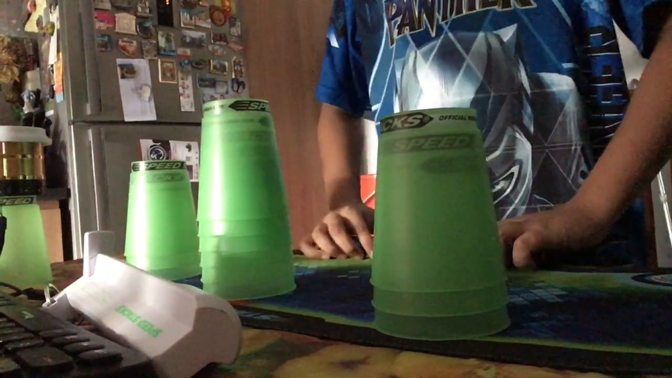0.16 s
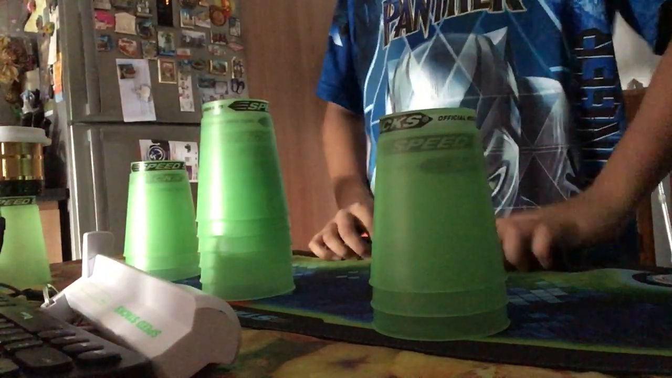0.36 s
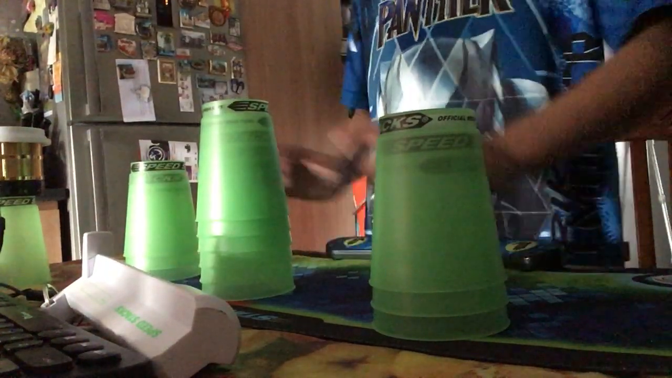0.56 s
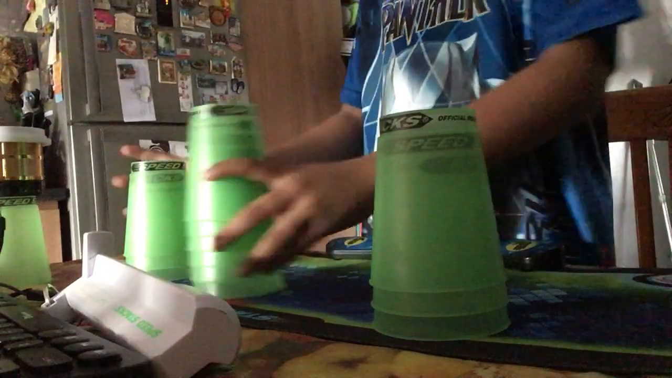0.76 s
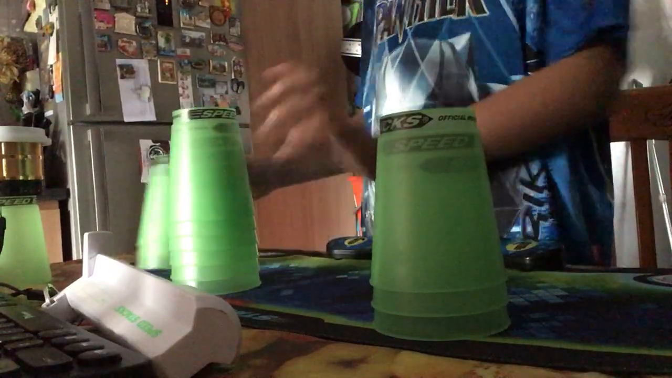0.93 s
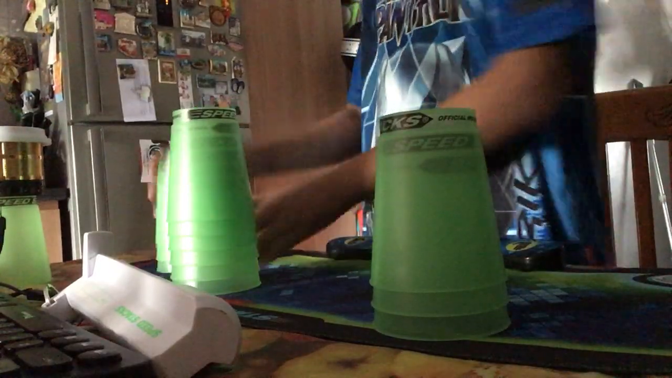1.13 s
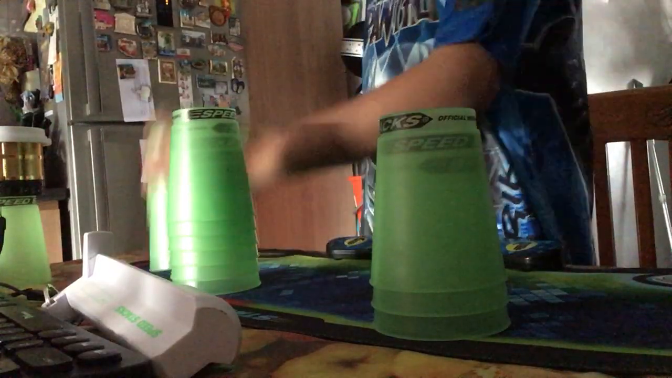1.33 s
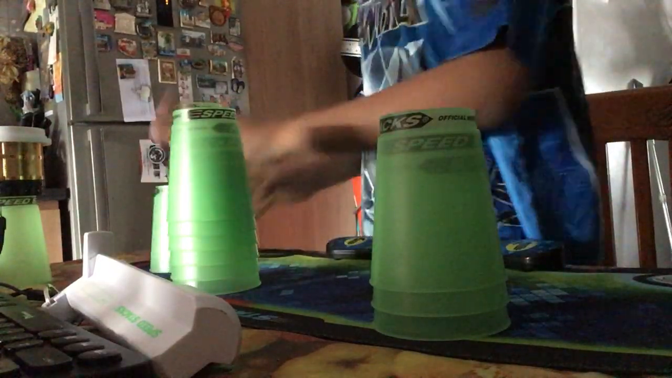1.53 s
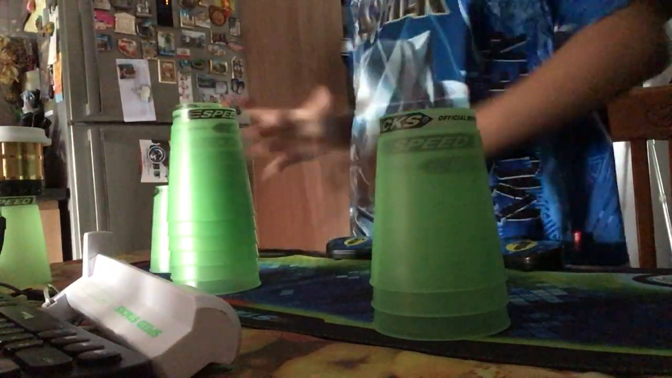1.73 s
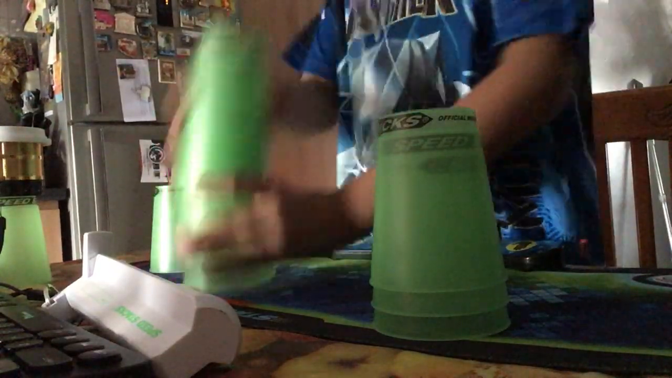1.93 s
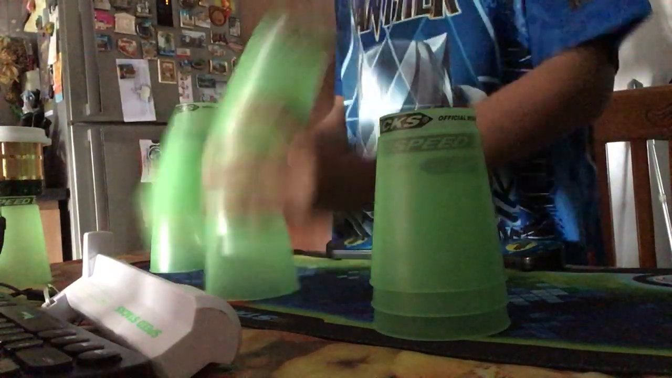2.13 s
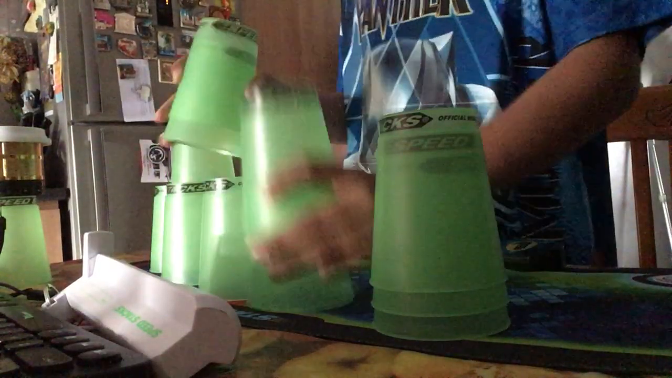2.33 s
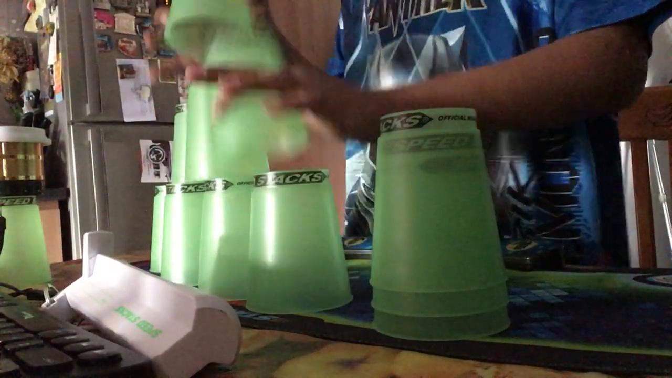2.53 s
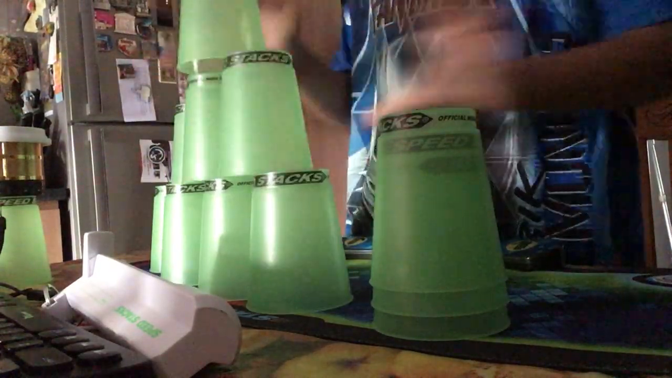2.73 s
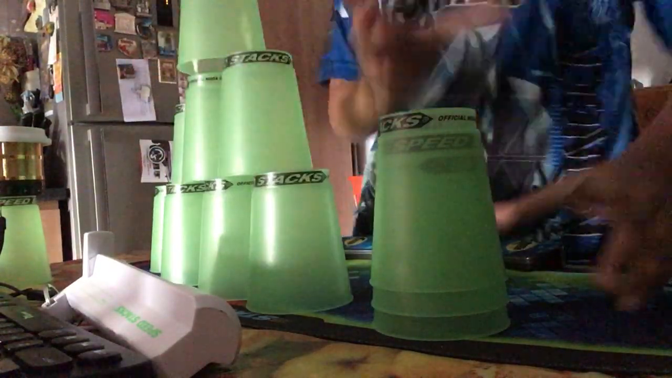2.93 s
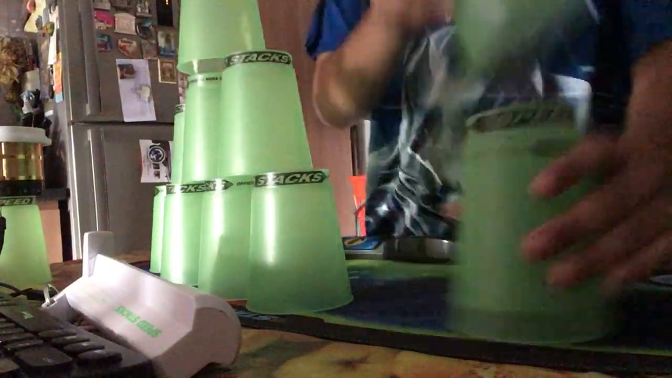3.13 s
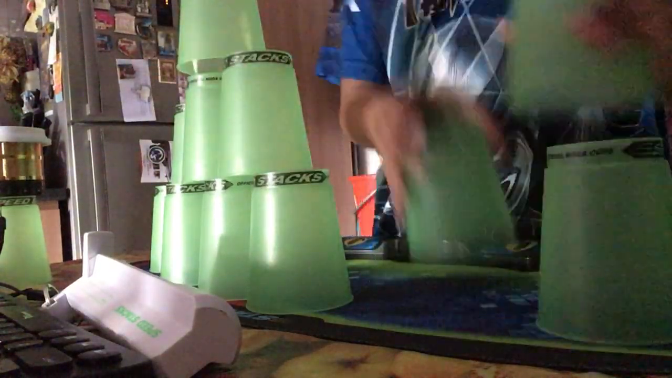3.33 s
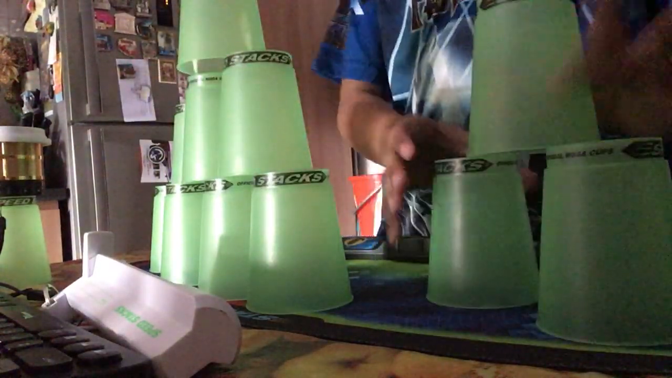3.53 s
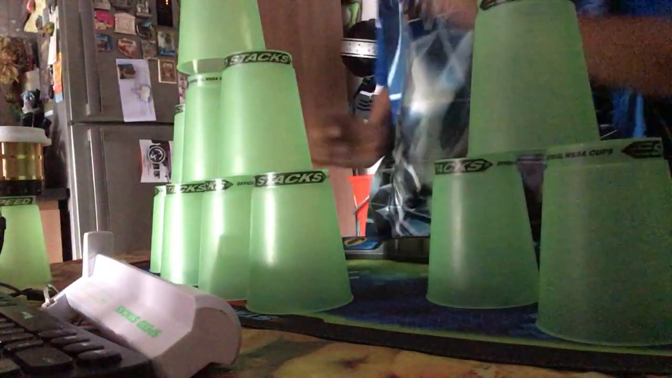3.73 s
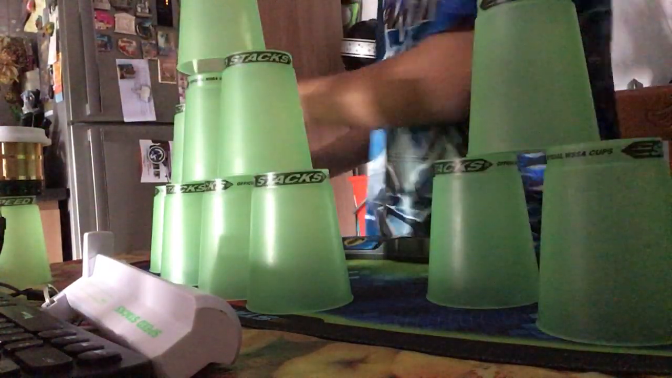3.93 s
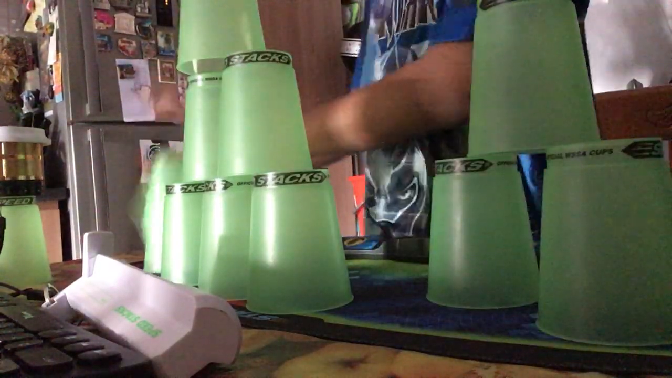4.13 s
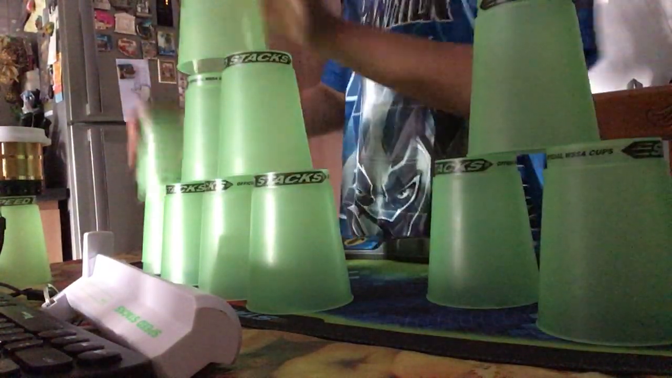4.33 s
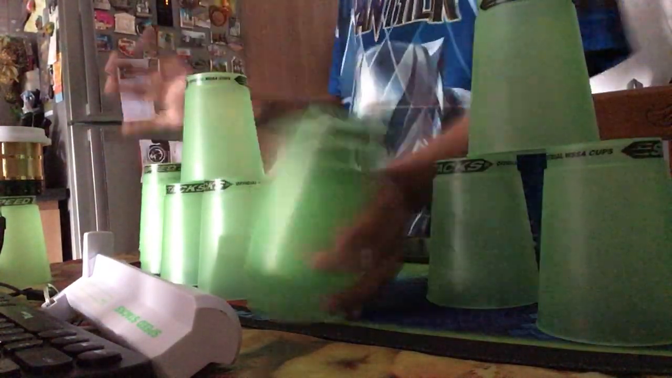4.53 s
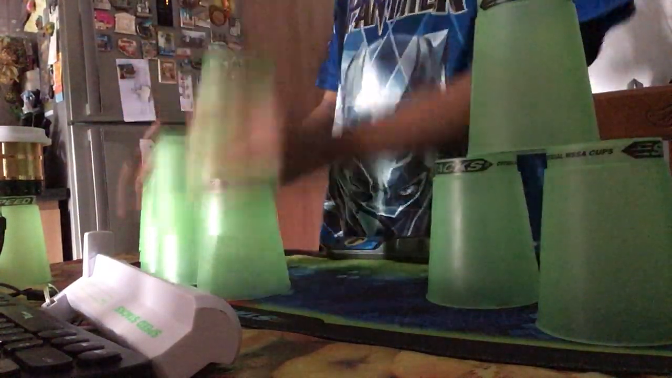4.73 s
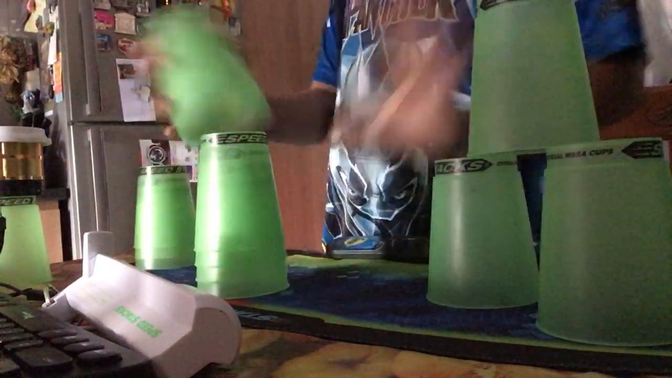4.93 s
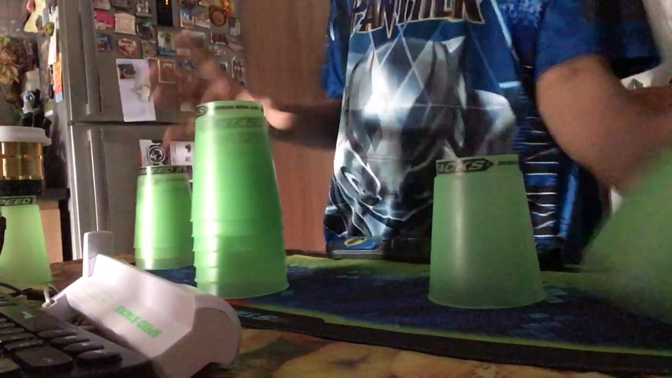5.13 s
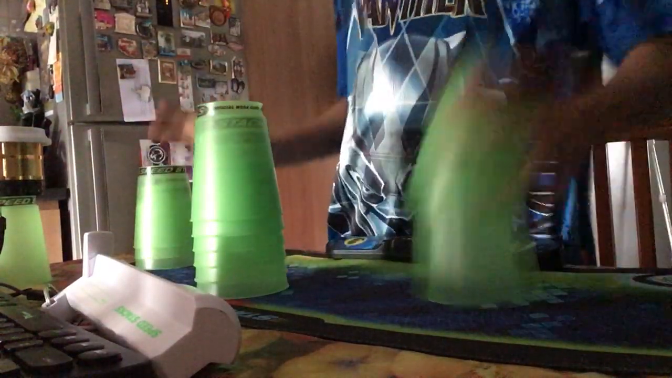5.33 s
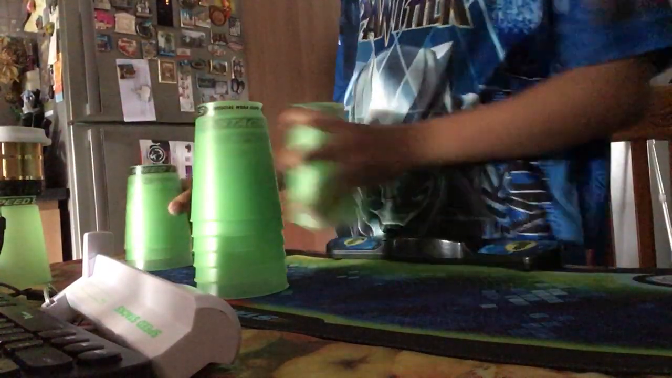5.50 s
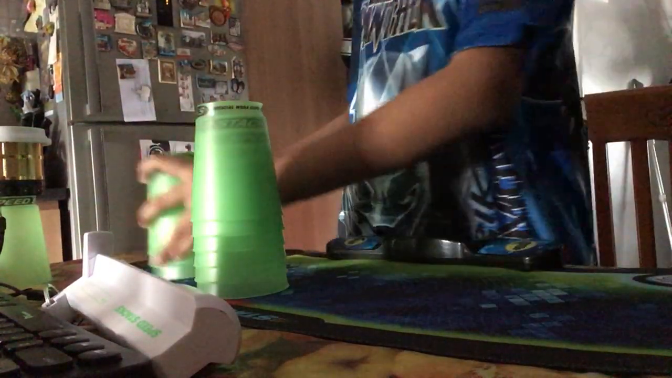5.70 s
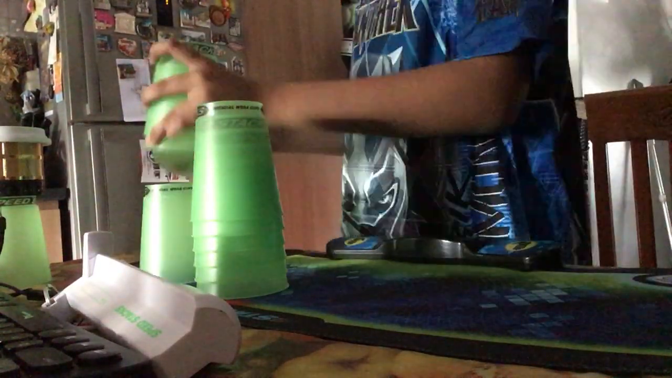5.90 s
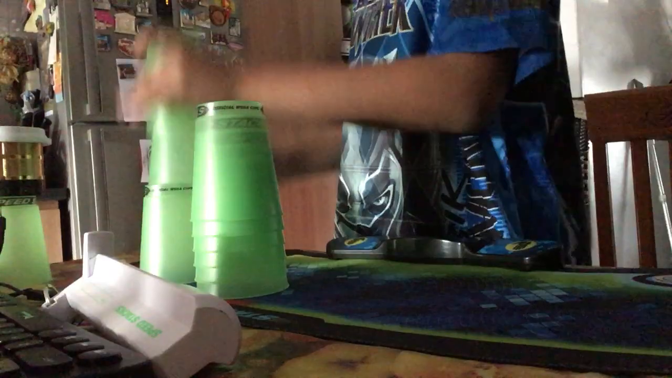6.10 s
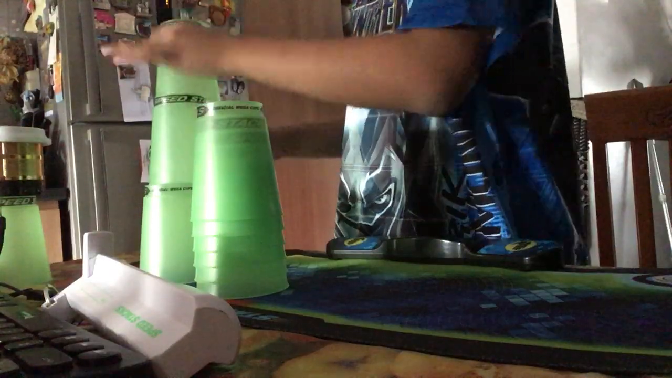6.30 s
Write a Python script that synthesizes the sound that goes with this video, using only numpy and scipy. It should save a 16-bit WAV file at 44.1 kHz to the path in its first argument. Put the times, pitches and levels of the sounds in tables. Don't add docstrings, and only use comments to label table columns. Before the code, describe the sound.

Light plastic cups clack and chatter as they are quickly stacked and pulled apart on a matted table, with hollow pops and dull wooden thumps.

```python
import sys
import numpy as np
from scipy import signal
from scipy.fft import rfft, irfft
from scipy.io import wavfile
from scipy.ndimage import uniform_filter1d

SR = 44100
rng = np.random.default_rng(int(sys.argv[2]) if len(sys.argv) > 2 else 0)


def transcribe(signal):
    frames = np.atleast_2d(signal).T
    limited = np.clip(frames, -1, 1)
    pcm = np.round(limited * 32767).astype(np.int16)
    wavfile.write(sys.argv[1], SR, pcm)


def level_to_linear(level):
    exponent = np.asarray(level, float) / 20
    return 10 ** exponent


N = 280476


def evened(x):
    return x / np.sqrt(np.mean(x ** 2) + 1e-20)


def read(points, hz):
    f, value = np.transpose(points)
    return np.interp(np.log(hz + 1), np.log(f + 1), value)


def add(mix, s, sound):
    part = mix[round(s * SR):][:len(sound)]
    part += sound[:len(part)]


# frequency in Hz, width in Hz.
SHELL_RESONANCES = [(2070, 52), (2450, 98), (3030, 130), (3400, 120), (3810, 29), (4090, 110), (4555, 70),
                    (5410, 140), (5780, 99), (6146, 49), (6800, 150), (7400, 43), (8600, 260), (9600, 120)]


def shell(hz, share):
    peaks = np.sqrt(sum(1 / (1 + (2 * (hz - f) / w) ** 2) ** 2 for f, w in SHELL_RESONANCES))
    return np.where((hz > 1500) & (hz < 11000), 1 - share + share * 2.5 * peaks, 1)


def noise(spectrum, shell_share=0):
    hz = np.fft.rfftfreq(N, 1 / SR)
    gain = level_to_linear(read(spectrum, hz))
    if shell_share:
        gain = gain * shell(hz, shell_share)
    return evened(irfft(rfft(rng.standard_normal(N)) * gain, N))


def drift(hz):
    low_pass = signal.butter(2, hz, fs=SR, output="sos")
    return evened(signal.sosfilt(low_pass, rng.standard_normal(N)))


def curve(rows, off=-120.):
    s, db = np.transpose(rows)
    return np.interp(np.arange(N) / SR, s, db, off, off)


def ring(modes, drive, luck, spread_db, detune, seconds):
    t = np.arange(round(seconds * SR)) / SR
    hz, db, t60 = np.transpose(modes)[:, :, None]
    level_luck, pitch_luck = luck[:len(modes), None], luck[8:8 + len(modes), None]
    decay = level_to_linear(db + spread_db * level_luck - 60 * t / t60)
    body = (decay * np.sin(2 * np.pi * hz * (1 + detune * pitch_luck) * t)).sum(0)
    out = signal.fftconvolve(body, drive)
    return out / abs(out).max()


# start in seconds, hollow knock in dB, rim crack in dB, cavity pitch in Hz.
POPS = [(1.261, -32, -38, 1480), (1.509, -17, -42, 600), (2.348, -30, -27.5, 1150),
        (2.665, -5.5, -29.5, 625), (2.721, -14.5, -23, 986), (2.726, -12.5, -18.5, 1360),
        (4.089, -13.5, -36.5, 1073), (4.186, -36, -44, 633), (4.499, -23.5, -16.5, 1030),
        (4.834, -3, -21, 700), (5.423, 3.5, -19.5, 646), (5.438, -15, -18, 1140), (5.489, -31, -20, 770)]
# start in seconds, hollow knock in dB, rim crack in dB, cavity pitch in Hz.
SEATS = [(2.266, -12, -42, 650), (2.516, -10.5, -33.5, 754), (2.594, -27.5, -44, 880),
         (2.68, -18, -43, 890), (2.709, -13.5, -30, 850), (2.735, -33, -27, 584), (3.57, -14, -24.5, 704),
         (4.453, -26, -37, 1000), (4.48, -15, -36, 680), (4.572, -20, -27, 580), (5.191, -19, -17, 570)]
# start in seconds, hollow knock in dB, wall in dB, cavity pitch in Hz.
SLAPS = [(1.5, -12.5, -38, 650), (1.55, -3.5, -18.5, 620), (1.565, -27, -27, 620),
         (2.104, -29.5, -29.5, 940), (2.128, -27, -29, 794), (2.423, -6.5, -35, 390),
         (2.432, -47, -38.5, 640), (3.307, -33.5, -41, 623), (3.558, -15.5, -17.5, 1065),
         (4.51, -19, -42, 1034), (4.553, -9.5, -9.5, 1080), (4.616, -11, -9, 863), (4.821, -34, -23.5, 616),
         (4.848, -12, -28, 574), (4.886, -1, -10, 300), (5.12, -31, -27, 1240), (5.139, -15, -13.5, 1060),
         (5.143, -14, -15.5, 1430), (5.164, -16, -45, 680), (5.2, -38, -34, 440), (5.206, -33, -23, 870),
         (5.448, -7, -11.5, 650), (5.475, -3, -5.5, 735), (5.761, -23, -22, 820), (6.102, -5, -26.5, 574),
         (6.135, -7.5, -24, 640)]
# start in seconds, hollow knock in dB, wall in dB, cavity pitch in Hz.
SCUFFS = [(0.063, -34, -28.5, 1290), (2.04, -36, -33, 875), (2.139, -40, -33.5, 730),
          (2.575, -31, -47, 945), (3.479, -33.5, -42.5, 575), (4.215, -35.5, -32, 1430),
          (4.273, -21, -21, 700), (4.803, -28, -40, 650), (4.865, -40, -23.5, 694),
          (5.221, -9.5, -6.5, 1000), (6.348, -15.5, -27, 1060)]
# start in seconds, hollow knock in dB, wall in dB, cavity pitch in Hz.
PATS = [(0.079, -39.5, -33.5, 561), (0.269, -42, -39, 610), (0.298, -40.5, -58, 1170),
        (0.34, -39.5, -37.5, 1280), (0.376, -41, -39, 1300), (0.527, -49, -49, 560),
        (0.824, -35.5, -42, 417), (1.138, -35, -42, 706), (1.17, -32, -43, 625), (1.948, -35, -41, 590),
        (2.155, -35, -35, 450), (3.108, -26.5, -38, 895), (4.157, -29.5, -44, 580), (5.741, -20, -23, 660),
        (6.066, -42, -60, 1170), (6.208, -29.5, -57, 990), (6.289, -31.5, -48, 705), (6.322, -34, -55, 700)]
# start in seconds, wall in dB, rim crack in dB.
TICKS = [(0.012, -43, -49), (0.035, -34, -51), (0.327, -39, -66.5), (1.401, -45, -46), (2.069, -34, -40),
         (2.212, -40, -47), (2.403, -35.5, -44), (2.439, -36, -35), (2.499, -45, -44), (3.131, -42, -46),
         (3.179, -35, -38), (3.265, -41, -43), (3.282, -61, -52), (3.364, -68, -43), (3.397, -67, -47),
         (3.406, -67, -43), (4.288, -21.5, -26), (5.104, -47, -42), (5.345, -65, -49), (5.443, -18, -21),
         (5.956, -43, -43)]


def contacts():
    rows = []
    for kind, wall_db, ms in [(POPS, -8.5, 4.8), (SEATS, -31, 9.2)]:
        rows += [(s, knock, crack + wall_db, crack, hz, ms) for s, knock, crack, hz in kind]
    for kind, crack_db, ms in [(SLAPS, -4.5, 5.94), (SCUFFS, -5, 12.4), (PATS, -26, 13.5)]:
        rows += [(s, knock, wall, wall + crack_db, hz, ms) for s, knock, wall, hz in kind]
    rows += [(s, -46.5, wall, crack, 650, 5.7) for s, wall, crack in TICKS]
    return sorted(rows)


# frequency in Hz, level in dB, t60 in seconds.
WALL_MODES = [(1850, -21.5, 0.032), (1843, 7.5, 0.0064), (2426, -2, 0.0087), (2726, 6.5, 0.0047),
              (3180, -1, 0.0073), (3880, -4.5, 0.016)]
# ratio to the cavity pitch, level in dB, t60 in seconds.
CAVITY_MODES = [(1.019, 6, 0.022), (1.475, -15, 0.011), (0.97, -22, 0.032), (0.62, -6, 0.022)]
# frequency in Hz, level in dB.
CRACK_SPECTRUM = [(2500, -35.5), (4500, -1.5), (6000, -1), (8000, -3), (10000, -4.5), (14000, -16.5)]
# frequency in Hz, level in dB.
SHEEN_SPECTRUM = [(6000, -8), (9000, 3), (11000, 4), (13000, 7.5), (16000, -6)]
SHELL_SHARE = 0.32
BUILT_S, REBUILD_S = 4.15, 5.9


def cups():
    out, rim, edge = np.zeros(N), np.zeros(N), np.zeros(N)
    t = np.arange(1300) / SR
    clacks = contacts()
    luck = rng.standard_normal((len(clacks), 16))
    chatter = rng.standard_normal((len(clacks), 2, 1300))
    for (s, knock_db, wall_db, crack_db, hz, ms), chance, (a, b) in zip(clacks, luck, chatter):
        u = t / (ms / 1000)
        touch = np.sqrt(6.4 * u) * np.exp(-2.7 * u ** 0.89)
        snap = (5.4 * u) ** .4 * np.exp(-3.2 * u)
        sparse_blows = touch * a * (abs(b) > 1.3)
        hollow = ring(np.array(CAVITY_MODES) * [hz, 1, 1], sparse_blows, chance, 7.0, 0.036, .06)
        add(out, s + 0.00085, level_to_linear(knock_db - 2.5) * hollow)
        add(out, s, level_to_linear(wall_db - 1.5) * ring(WALL_MODES, snap * b, chance[::-1], 3.5, 0.031, .03))
        add(rim, s, level_to_linear(crack_db - 3.0) * snap)
        building = s < BUILT_S or s > REBUILD_S
        dull_db = 1.5 * building * max(knock_db + 37, 0)
        add(edge, s, level_to_linear(crack_db - 3.5 - dull_db) * snap)
    crack = rim * noise(CRACK_SPECTRUM, SHELL_SHARE) + edge * noise(SHEEN_SPECTRUM)
    return out + crack * level_to_linear(2.5 * drift(1000))


# start in seconds, peak in dB, frequency in Hz.
HOLLOW_NOTES = [(1.26, -33, 1480), (1.551, -14, 1230), (2.516, -24, 1042), (2.73, -16.5, 1284),
                (2.732, -18.5, 632), (3.284, -44, 3100), (3.309, -41, 3030), (3.56, -14, 600),
                (3.559, -14, 1134), (4.277, -25, 4020), (4.555, -12.5, 683), (4.618, -20, 1930),
                (5.141, -14, 1700), (5.207, -15.5, 3150), (5.227, -10.5, 1058), (5.424, -12, 1205),
                (5.474, -9, 4150), (6.103, -16, 1030), (6.350, -19, 650), (3.559, -20.5, 1260),
                (3.561, -23, 1046), (4.620, -21, 880), (2.722, -22, 1038), (1.261, -44, 1900),
                (5.172, -26, 1160), (4.092, -26.5, 600), (1.553, -24, 1100)]


def hollow_notes():
    out = np.zeros(N)
    luck = rng.standard_normal((len(HOLLOW_NOTES), 16))
    for (s, db, hz), chance in zip(HOLLOW_NOTES, luck):
        lone = s < BUILT_S and hz < 2000
        t60 = 0.083 if lone else 0.036
        modes = [(hz, 0, t60), (hz + 45, -9, .7 * t60), (hz + 8, -15, 3.4 * t60), (hz - 70, -9, .6 * t60)]
        add(out, s, level_to_linear(db) * ring(modes, np.hanning(12), chance, 0.81, 0.0011, .3))
    return out


# start in seconds, peak in dB, frequency in Hz.
LOW_PINGS = [(1.5002, -25, 2440), (1.5504, -15, 2440), (1.5644, -28, 2280), (2.039, -39, 1800),
             (2.103, -31, 1780), (2.1398, -24, 1710), (2.1563, -32, 1680), (2.2714, -23, 1770),
             (2.4304, -41, 2480), (2.5156, -21, 1520), (2.666, -19, 1310), (2.7096, -25, 1500),
             (2.728, -32, 1510), (3.5576, -33, 1540), (4.215, -27, 1490), (4.2294, -44, 2570),
             (4.2739, -18, 1750), (4.2874, -18, 2140), (4.5095, -23, 1610), (4.5535, -7.5, 2050),
             (4.6166, -7, 2000), (4.8329, -15, 1820), (4.8862, -7, 2250), (5.1197, -28, 1740),
             (5.1385, -7.5, 1880), (5.1432, -16, 1520), (5.2006, -15, 3050), (5.2194, -10, 2010),
             (5.4236, -9.5, 2900), (5.444, -15, 1500), (5.473, -10, 3030), (5.4914, -13, 1990),
             (5.7452, -24, 1750), (5.7612, -20.5, 2050), (6.102, -10, 1735), (6.115, -31, 1730),
             (6.3484, -35, 2350)]
# start in seconds, peak in dB, frequency in Hz.
MID_PINGS = [(1.5509, -25, 4130), (2.0398, -29, 4070), (2.1031, -29, 4120), (2.1281, -39, 4200),
             (2.4024, -47, 3100), (2.4134, -39, 3990), (2.4319, -33, 3100), (2.4319, -39, 3220),
             (2.7304, -19, 5150), (3.5578, -24, 3880), (4.1874, -40, 3450), (4.2303, -31, 3250),
             (4.2454, -39, 3230), (4.2742, -26, 4150), (4.2844, -32, 4030), (4.5104, -23, 4300),
             (4.5535, -5, 3630), (4.5694, -20, 3510), (4.6169, -30, 3640), (4.8339, -18, 4100),
             (4.8858, -16, 3670), (5.1444, -22, 3420), (5.1916, -17, 3070), (5.223, -16.5, 3280),
             (5.2424, -32, 3800), (5.4231, -14, 4180), (5.4364, -24.5, 4600), (5.4914, -25, 4080),
             (5.7438, -27, 3320), (5.7613, -23, 3270), (6.1015, -41, 3480)]
# start in seconds, peak in dB, frequency in Hz.
HIGH_PINGS = [(1.509, -36, 5260), (1.5517, -21, 5700), (1.5661, -18, 4900), (2.0403, -35, 5610),
              (2.0677, -35, 5810), (2.139, -36, 5600), (2.3484, -38, 5900), (2.5137, -25, 5500),
              (2.6658, -29, 5320), (2.7097, -24, 5300), (2.7316, -15, 6500), (3.5603, -17.5, 5340),
              (4.1859, -34, 9870), (4.199, -32, 5980), (4.215, -26.5, 5270), (4.2294, -31, 5450),
              (4.275, -24, 8680), (4.2874, -27, 6460), (4.4988, -12, 5800), (4.51, -18, 5270),
              (4.553, -13.5, 5860), (4.5754, -22, 5240), (4.616, -18, 5940), (4.8337, -14.5, 5980),
              (4.8867, -18, 5100), (5.1437, -14.5, 5630), (5.1925, -18, 5900), (5.2, -18, 8300),
              (5.2063, -18.5, 5200), (5.2225, -6.5, 6100), (5.4223, -14.5, 6670), (5.438, -18, 8350),
              (5.4745, -15, 8400), (5.7443, -31, 9500), (5.7616, -28, 5730), (6.103, -21, 5640),
              (6.1164, -32, 9650), (6.1454, -32, 6000)]


def shell_pings():
    out, rows = np.zeros(N), LOW_PINGS + MID_PINGS + HIGH_PINGS
    luck, chances = rng.standard_normal((len(rows), 16)), rng.random((len(rows), 60))
    t60 = 0.018
    for (s, db, hz), chance, blows in zip(rows, luck, chances):
        modes = [(hz, 0, t60), (hz * 1.06, -8, .7 * t60), (hz * 1.1, -27, 6 * t60)]
        brush = np.hanning(60) * (blows > .8) + np.eye(60)[0]
        add(out, s, level_to_linear(db - 3) * ring(modes, brush, chance, 1.4, .002, .12))
    return out


# start in seconds, peak in dB, frequency in Hz, t60 in seconds.
LINGERS = [
    (1.262, -45, 1510, .26),
    (1.565, -40, 1250, .34),
    (4.63, -36, 1990, .4),
    (2.712, -19, 1280, .06),
    (3.562, -19, 1200, .07),
    (4.498, -28, 1080, .3),
    (4.835, -11, 800, .045),
    (5.16, -23, 700, .12),
    (5.245, -31, 1050, .2),
]


def lingers():
    out, t = np.zeros(N), np.arange(SR // 2) / SR
    waver, sway = level_to_linear(4.0 * drift(40)), drift(20)
    for s, db, hz, t60 in LINGERS:
        fade = np.minimum(t / .003, 1) * level_to_linear(db - 60 * t / t60)
        add(out, s, fade * np.sin(2 * np.pi * hz * t + sway[round(s * SR):][:len(t)]))
    return out * waver


# middle in seconds, length in seconds, fizz in dB, rattle in dB.
SLIDES = [(0.065, 0.12, -61, -56), (0.337, 0.23, -63, -54.5), (1.305, 0.11, -49.5, -66),
          (1.99, 0.18, -58, -59), (2.094, 0.16, -47, -53), (2.055, 0.023, -62, -49),
          (2.226, 0.14, -52, -64), (2.286, 0.042, -65, -60), (2.354, 0.06, -64, -56),
          (2.42, 0.06, -63, -57), (2.49, 0.1, -49, -70), (2.608, 0.11, -62, -57),
          (2.738, 0.054, -47, -26.5), (3.116, 0.047, -56, -49), (3.203, 0.11, -44.5, -60),
          (3.322, 0.048, -54.5, -60), (3.399, 0.038, -55, -56.5), (4.25, 0.17, -46, -44),
          (4.499, 0.1, -42, -37), (4.532, 0.075, -38, -31.5), (4.611, 0.0085, -39, -46),
          (4.868, 0.17, -38, -43), (4.882, 0.0081, -35, -26), (5.128, 0.085, -51.5, -57),
          (5.171, 0.069, -37, -40), (5.229, 0.046, -24.5, -19.5), (5.35, 0.016, -44.5, -65),
          (5.46, 0.056, -37, -37), (5.902, 0.19, -60, -57), (6.167, 0.05, -52, -51),
          (6.234, 0.14, -55, -54)]
# start in seconds, t60 in seconds, fizz in dB, rattle in dB.
SKIDS = [(2.515, 0.17, -41, -34.5), (4.092, 0.36, -48.5, -60), (2.27, 0.23, -48, -60),
         (2.35, 0.17, -61, -51), (5.35, 0.36, -54, -59), (2.666, 0.18, -43, -46), (4.185, .15, -50, -54),
         (4.288, 0.33, -38, -57), (4.556, .2, -33.5, -37), (4.618, .2, -36.5, -48),
         (5.424, 0.22, -34.5, -39), (5.475, 0.38, -35, -41), (5.744, 0.25, -39, -38),
         (6.101, 0.29, -41.5, -39)]
# frequency in Hz, level in dB.
RUB_SPECTRUM = [(2000, -5.5), (4000, -2), (7000, 0.5), (13000, -3), (16000, -14)]
# frequency in Hz, level in dB.
RATTLE_SPECTRUM = [(300, -21), (700, 7), (1200, -1.5), (2000, -11.5), (3500, -5.5), (5500, -34.5)]


def slides():
    fizz, body = np.zeros(N), np.zeros(N)
    for s, length, fizz_db, rattle_db in SLIDES:
        phase = np.linspace(0, 1, round(length * SR)) ** 0.68
        swell = np.sin(np.pi * phase).clip(0) ** 2.4
        start = max(s - length / 2, 0)
        add(fizz, start, level_to_linear(fizz_db) * swell)
        add(body, start, level_to_linear(rattle_db) * swell)
    for s, t60, fizz_db, rattle_db in SKIDS:
        fade_db = -60 * np.arange(SR // 2) / SR / t60
        add(fizz, s, level_to_linear(fizz_db + fade_db))
        add(body, s, level_to_linear(rattle_db + fade_db))
    grain = level_to_linear(4.5 * drift(150))
    rubbing = fizz * grain ** 0.45 * noise(RUB_SPECTRUM, SHELL_SHARE)
    return rubbing + body * grain * level_to_linear(-3.0) * noise(RATTLE_SPECTRUM)


# start in seconds, boom in dB, knock relative to boom in dB.
LANDINGS = [(0.071, -27.5, -4), (0.531, -35, -13), (1.202, -51.5, 13.5), (1.502, -20, 1.5), (1.548, -43, 4),
            (1.955, -22, -15), (2.265, -19, 5), (2.667, -31, 4), (2.715, -24, 2), (3.099, -23.5, -10.5),
            (3.15, -22, -24), (3.478, -18.5, -5.5), (3.563, -27.5, -5), (4.093, -28.5, 2.5),
            (4.188, -34, 6), (4.289, -31.5, 3.5), (4.48, -23.5, 2.5), (4.555, -28.5, 12),
            (4.616, -10.5, 1.5), (4.833, -15, 2), (4.886, -9, -2), (5.137, -35.5, 14), (5.424, -12.5, -4.5),
            (5.475, -10.5, -0.6), (5.494, -12.5, -30), (5.738, -22, -1), (6.139, -23, 2.5),
            (6.347, -30.5, 3)]
# start in seconds, boom in dB, knock relative to boom in dB.
PRESSED = [(0.827, -26.5, -20), (1.175, -25.5, -1.5), (2.092, -23, -1), (2.128, -24, -2.5), (2.3, -32, 9),
           (2.423, -15.5, 1), (2.522, -29, -8), (2.741, -33.5, 6.5), (3.256, -29.5, -5.5),
           (5.223, -16.5, 2.5), (5.452, -14.5, -4), (5.766, -24.5, 1.5), (6.1, -36, 0)]
# frequency in Hz, level in dB, t60 in seconds.
BOOM_MODES = [(88.8, 3, 0.16), (121.9, 5.5, 0.34)]
# frequency in Hz, level in dB, t60 in seconds.
KNOCK_MODES = [(181.9, -2, 0.39), (241.3, -0.5, 0.13), (270.5, -6, 0.28), (333, -0.5, 0.23), (377, 0, 0.23),
               (550, -9, 0.013), (620, -15, 0.081), (760, 3, 0.029)]


def table():
    out = np.zeros(N)
    thumps = sorted([(*row, 0.86) for row in LANDINGS] + [(*row, 0.57) for row in PRESSED])
    luck = rng.standard_normal((len(thumps), 16))
    for (s, db, knock_db, hold), chance in zip(thumps, luck):
        damping = [1, 1, hold]
        low, high = np.array(KNOCK_MODES[:4]) * damping, np.array(KNOCK_MODES[4:]) * damping
        boom = ring(np.array(BOOM_MODES) * damping, np.hanning(300), chance, 3.6, 0.028, .5)
        low_knock = ring(low, np.hanning(110), chance[1:], 2.2, 0.02, 0.45)
        high_knock = ring(high, np.hanning(40), chance[4:], 1.6, 0.048, 0.15)
        add(out, s + 0.0067, level_to_linear(db) * boom)
        add(out, s + 0.0029, level_to_linear(db + knock_db + 3.0) * low_knock)
        add(out, s + 0.00094, level_to_linear(db + knock_db - 9.0) * high_knock)
    return out * level_to_linear(1.2 * drift(60))


# frequency in Hz, t60 in seconds.
ROOM_DECAY = [(100, 0.8), (700, 0.28), (1840, 0.27), (4850, 0.34), (12800, 0.32)]


def room(x):
    frame = dict(nperseg=512, noverlap=384)
    hz, s, z = signal.stft(x, SR, **frame)
    power = abs(z) ** 2
    blur = np.clip((hz - 1250) / 2200, 0, .7)[:, None]
    power = (1 - blur) * power + blur * uniform_filter1d(power, size=9, axis=0)
    keep = level_to_linear(-120 * (s[1] - s[0]) / read(ROOM_DECAY, hz))
    tail = np.array([signal.lfilter([1 - k], [1, -k], p) for k, p in zip(keep, power)])
    tail = np.pad(tail, ((0, 0), (2, 0)))[:, :len(s)]
    fresh = signal.stft(rng.standard_normal(N), SR, **frame)[2]
    size = np.sqrt(abs(tail)) * shell(hz, 0.16)[:, None] * evened(abs(fresh))
    return signal.istft(size * np.exp(1j * np.angle(fresh)), SR, **frame)[1][:N]


# frequency in Hz, level in dB.
HUM_SPECTRUM = [(21, -45), (35, 7), (101, 0), (173, -2.5), (300, -11), (620, -24), (2020, -34),
                (15000, -45)]
# frequency in Hz, wobble in Hz, level in dB.
HUM_TONES = [(306.7, 2.5, -53), (554, 3.7, -68.5), (188, 5.4, -61)]
# frequency in Hz, level in dB.
HISS_SPECTRUM = [(5000, -21.5), (6800, -17.5), (8200, -7.5), (9500, -8), (10500, -10), (12500, -10.5),
                 (14500, -18.5), (15800, -30)]
# time in seconds, level in dB.
GATE = [(0, -60), (1.2, -58.5), (2.0, -58), (2.5, -81), (2.8, -99), (3.1, -73), (3.62, -78), (3.85, -60.5),
        (4.1, -61), (4.4, -62.5), (5.0, -60.5), (6.05, -77), (6.36, -89)]
# time in seconds, level in dB.
WHINE = [
    (2.98, -95),
    (3.01, -67.5),
    (3.6, -71.5),
    (4.15, -65),
    (5.1, -73),
    (5.3, -88),
]


def background():
    t = np.arange(N) / SR
    tones = np.zeros(N)
    for hz, wobble, db in HUM_TONES:
        phase = 2 * np.pi * np.cumsum(hz + 2.2 * drift(wobble)) / SR
        tones += level_to_linear(db + 2.6 * drift(wobble)) * np.sin(phase)
    tones *= level_to_linear(-14 * np.clip(t - 1.1, 0, .3) / 0.59)
    whine_phase = 2 * np.pi * np.cumsum(10845 + 15 * drift(26)) / SR
    whine = level_to_linear(curve(WHINE) + 1.9 * drift(36)) * np.sin(whine_phase)
    low_pass = signal.butter(4, 12500, fs=SR, output="sos")
    hum = level_to_linear(-44.5 + 1.0 * drift(5.4)) * signal.sosfilt(low_pass, noise(HUM_SPECTRUM))
    hiss = level_to_linear(curve(GATE, -72.)) * noise(HISS_SPECTRUM)
    return hum + tones + whine + hiss


def scene():
    near = cups() + hollow_notes() + shell_pings() + slides()
    reverberation = level_to_linear(-9.5) * room(near)
    return (near + reverberation + lingers() + table() + background())[None]


def top_cut(x):
    return signal.sosfilt(signal.butter(12, 16640, fs=SR, output="sos"), x)


def record(dry):
    x = signal.sosfilt(signal.butter(3, 81.4, "high", fs=SR, output="sos"), dry)
    x = 0.81 * np.tanh(x / 0.88)
    mix = signal.oaconvolve(x, signal.firwin(301, 16100, fs=SR)[None], "same")
    return top_cut(mix)


dry = scene()
out = record(dry)
transcribe(out)
```